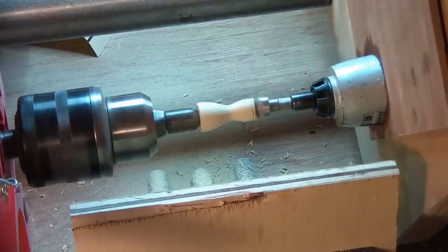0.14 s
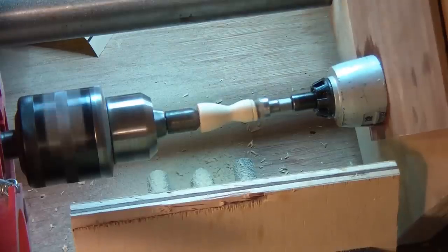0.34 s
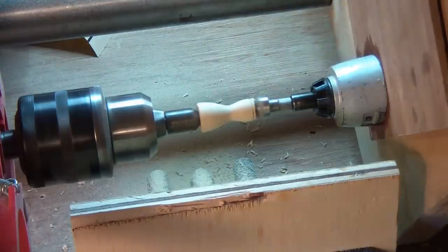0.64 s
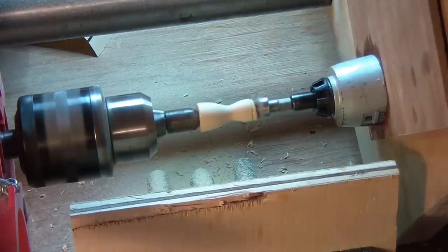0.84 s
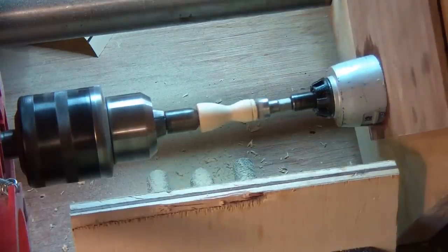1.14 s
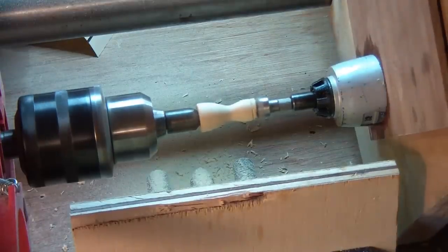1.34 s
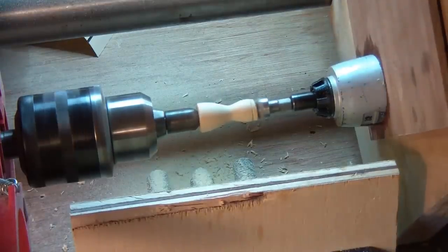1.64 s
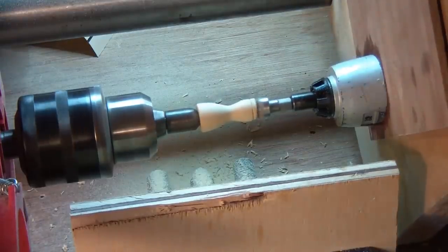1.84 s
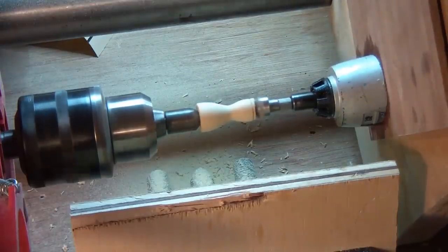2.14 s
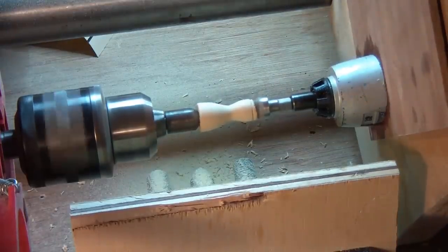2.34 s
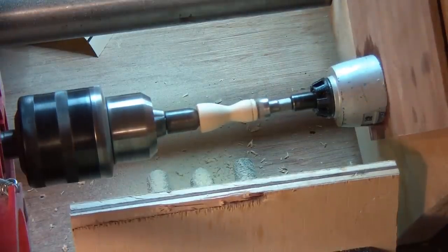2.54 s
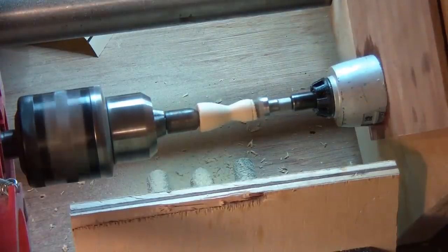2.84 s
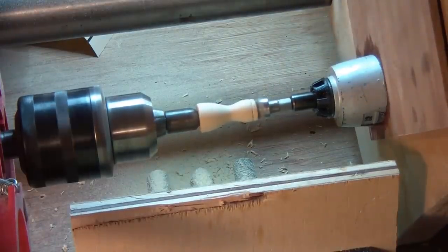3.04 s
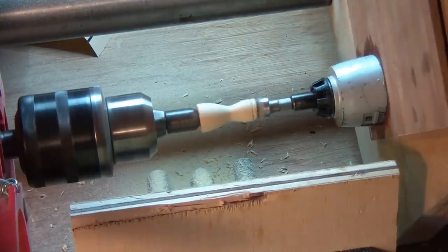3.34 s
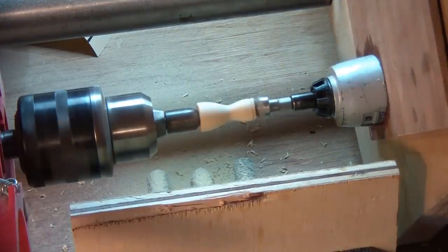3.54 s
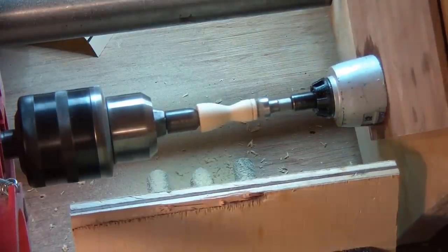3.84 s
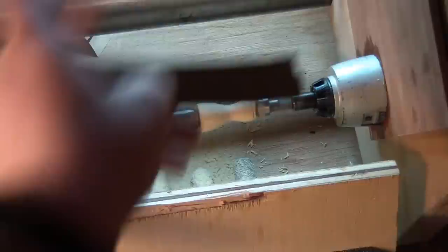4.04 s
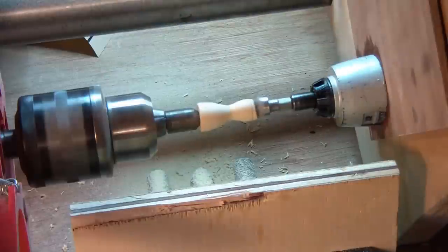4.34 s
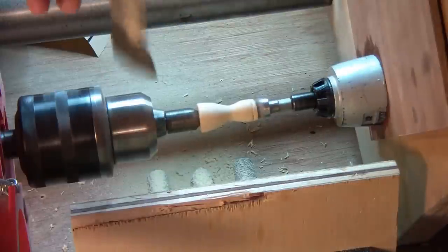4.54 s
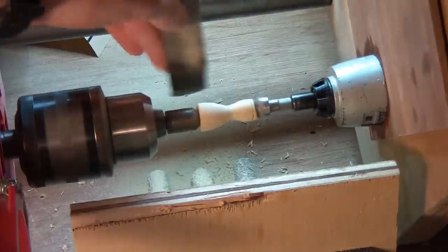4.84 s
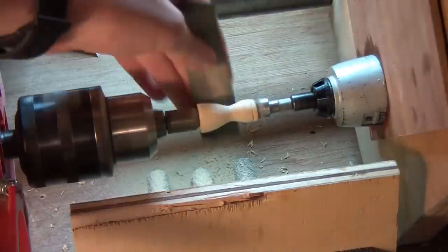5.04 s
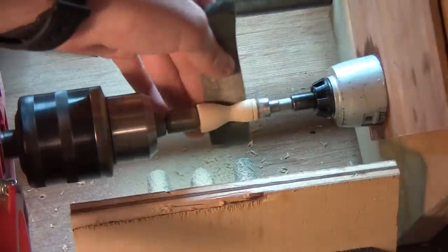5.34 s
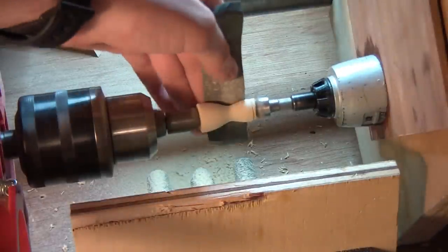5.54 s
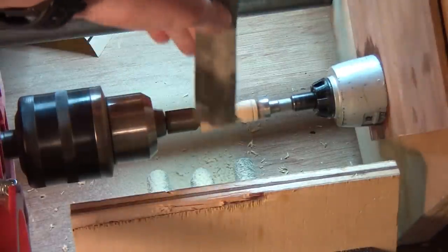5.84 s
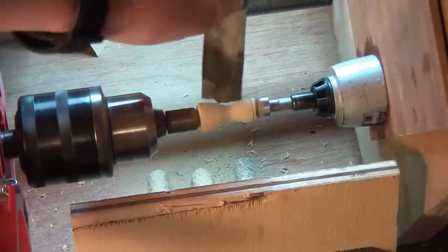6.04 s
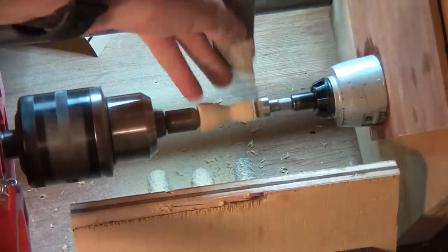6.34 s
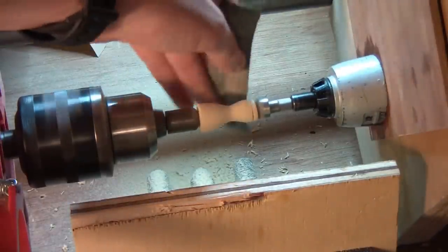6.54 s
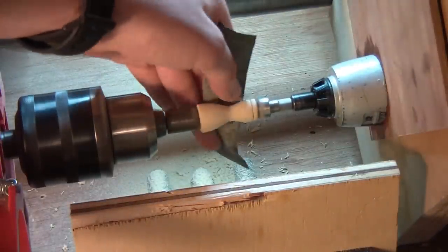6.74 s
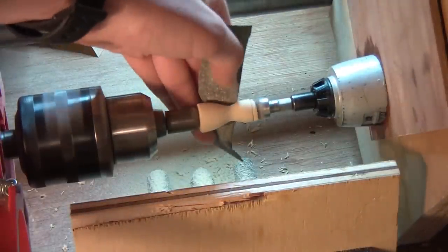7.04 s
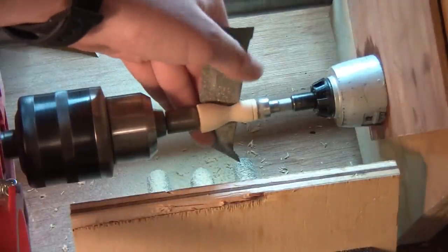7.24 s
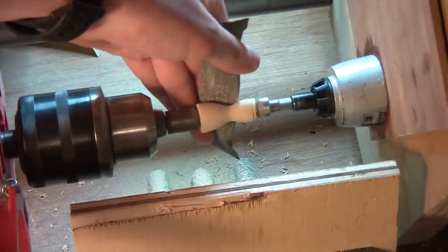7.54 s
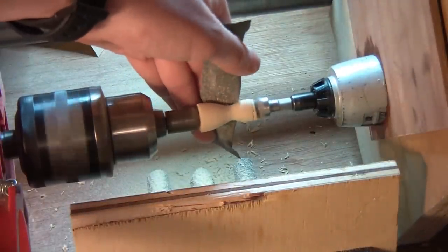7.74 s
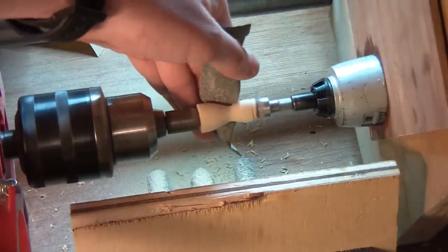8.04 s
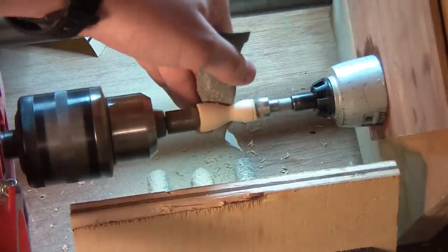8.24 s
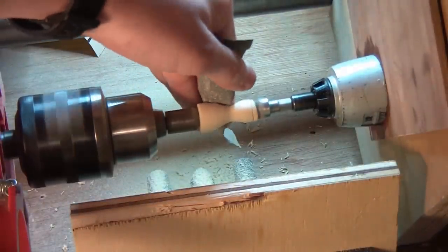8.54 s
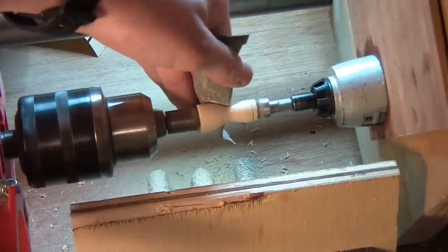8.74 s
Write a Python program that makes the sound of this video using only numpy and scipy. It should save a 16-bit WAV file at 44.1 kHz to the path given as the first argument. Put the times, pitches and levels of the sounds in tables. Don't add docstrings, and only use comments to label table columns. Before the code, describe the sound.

Constant buzzing motor hum with belt rumble; sandpaper rustles in the hands, bites wood in a short rasp, then a longer, brighter fizzing hiss.

```python
import sys
import numpy as np
from scipy import signal
from scipy.io import wavfile
from scipy.ndimage import uniform_filter1d

SR = 44100
rng = np.random.default_rng(int(sys.argv[2]) if len(sys.argv) > 2 else 0)


def amplitude_ratio(level_db):
    exponent = np.asarray(level_db, float) / 20
    return 10 ** exponent


def unload_audio(sound):
    columns = np.transpose(np.atleast_2d(sound))
    steps = np.round(np.clip(columns, -1, 1) * 32767)
    wavfile.write(sys.argv[1], SR, steps.astype(np.int16))


N = 392049
T = np.arange(N) / SR

FIELD_HZ, ROTOR_HZ, BELT_HZ, SPINDLE_HZ = 99.964, 24.812, 6.1, 13.4
EDGE_HZ = 10880

# time in seconds, hum level in dB,
# damping by the hand on the work from 0 to 1, belt shake in dB.
MOTOR = [(0, -17, 0.05, 2), (.44, -17, 0, 0), (1, -17.5, 0.02, 1.5), (1.6, -17.5, 0.05, 0),
         (2.2, -18, 0.12, 1), (2.6, -18, 0, 1.5), (3.2, -16, 0.12, 0), (4, -17, 0, 1), (4.7, -16, .05, .5),
         (5.4, -17, 0, 0.5), (6, -17.5, 0, 1.5), (6.7, -17, 0.02, -0.5), (7.15, -15.5, 0.12, -0.5),
         (7.8, -17, 0.13, 1), (8.05, -18, 0.14, 0), (8.35, -18.5, 0.2, 1), (8.45, -19.5, 0.86, 0),
         (8.89, -17.5, 0.6, 2)]


def evened(x):
    return x / np.sqrt(np.mean(x ** 2) + 1e-20)


def read(points, hz):
    f, value = np.transpose(points)
    return np.interp(np.log(hz + 1), np.log(f + 1), value)


def curves(rows):
    s, *columns = np.transpose(rows)
    return [np.interp(T, s, column) for column in columns]


def wander(rate_hz):
    r = np.exp(-2 * np.pi * rate_hz / SR)
    return evened(signal.lfilter([1], np.convolve([1, -r], [1, -r]), rng.standard_normal(N)))


def noise(gain, patchy_db, flicker_db, near=1):
    # frequency in Hz, side minus mid in dB.
    port_difference = [(30, -11), (70, -14), (120, -25), (550, -25), (800, -18), (3500, -12.5), (5000, -4),
                       (6400, 1.5), (7500, -0.5), (8000, -1), (9700, -2), (10700, -0.5)]
    frames, hz = N // 256 + 5, np.fft.rfftfreq(1024, 1 / SR)
    a, b, c, d, patches = rng.standard_normal((frames, 513, 5)).T
    patches = uniform_filter1d(patches, size=12, axis=0)
    patches = evened(uniform_filter1d(patches, size=10, axis=1))
    flicker = evened(uniform_filter1d(rng.standard_normal(frames), size=4))
    mid = a + 1j * b
    side = amplitude_ratio(near * read(port_difference, hz))[:, None] * (c + 1j * d + 0.074 * mid)
    z = np.array([mid + side, mid - side])
    z *= gain(hz)[:, None] * amplitude_ratio(patchy_db * patches + flicker_db * flicker)
    return evened(signal.istft(z, nperseg=1024, noverlap=768)[1][:, :N])


def tone(hz, width_hz=0.):
    drift = np.cumsum(rng.standard_normal(N)) * np.sqrt(2 * np.pi * abs(width_hz) / SR)
    return np.sqrt(2) * np.cos(2 * np.pi * (hz * T + rng.random()) + drift)


def each_turn(hz, count):
    harmonics = range(1, count + 1)
    return evened(sum(np.cos(2 * np.pi * (k * hz * T + rng.random())) / np.sqrt(k) for k in harmonics))


def bursts(rows, sound, rise):
    shape = np.zeros(N)
    for s, db, t60 in rows:
        start = round((s - .05) * SR)
        u = T[start:][:SR // 2] - s
        shape[start:][:SR // 2] += amplitude_ratio(db + np.where(u < 0, 60 * u / rise, -60 * u / max(t60, .01)))
    return shape * sound


def swells(rows):
    total = 0
    for s, db, rise, fall in rows:
        away = np.where(T < s, (s - T) / max(rise, .01), (T - s) / max(fall, .01))
        total = total + amplitude_ratio(db - 20 * away)
    return total


def hum():
    # multiple, level in dB above the first order.
    upper_orders = [(4, -13.8), (6, -14), (7, -23), (8, -21.5), (9, -23.5), (15, -34)]
    whirr_hz = [140, 181.2, 254, 267, 327, 354, 487, 512.4, 575, 624.5, 750, 775, 819.7, 855, 1020, 1120,
                1144, 1244.4, 1270, 1445, 1715, 2331, 2719, 3085, 3391, 4390, 7290, 8280]
    # level in dB above the first order, width in Hz.
    whirr_lines = [(-27, 13), (-18, 1.96), (-22, 4.4), (-19, 4.9), (-19.5, 6), (-17, 1.6), (-20, 3.2),
                   (-19.5, 1.1), (-18.5, 1), (-24, 0.83), (-27.5, 3), (-28, 4.7), (-20, 0.75), (-25.5, 8),
                   (-26.5, 7.9), (-31.5, 6), (-24, 1.8), (-30, 4.5), (-39, 1.8), (-30, 3), (-30, 9),
                   (-41, 15), (-35.5, 15), (-42, 60), (-64, 10), (-38, 50), (-55, 60), (-46, 50)]
    first_db, damping, _ = curves(MOTOR)
    orders = [(1, 0.003), (2, -3 * damping), (3, -8.5 - 12 * damping), (5, -0.1 - 1.5 * damping)]
    belt, rotor = each_turn(BELT_HZ, count=3), each_turn(ROTOR_HZ, count=1)
    cycle = 2 * np.pi * FIELD_HZ * (T - .0046)
    angle = cycle + .015 * belt + .01 * wander(8.0) + .006 * rotor
    spread = .55
    pull = 0
    for k, db in orders + upper_orders:
        shake_db = 0.42 * np.sqrt(k) * belt + 0.15 * np.sqrt(k) * wander(16.0)
        pull = pull + amplitude_ratio(db + shake_db) * np.sqrt(2) * np.cos(k * angle - spread * k * (k - 1))
    whirr = sum(amplitude_ratio(db + 2.2 * wander(7.8)) * tone(hz, width)
                for hz, (db, width) in zip(whirr_hz, whirr_lines))
    lap = 2 * np.pi * ROTOR_HZ * (T - .014)
    fifth = 5 * angle - spread * 20
    slip = amplitude_ratio(-5.5 + 2.1 * wander(4.4)) * (np.cos(fifth - lap) + amplitude_ratio(-9.0) * np.cos(fifth + lap))
    mono = amplitude_ratio(first_db) * (pull + whirr + slip)
    side = amplitude_ratio(-14.5) * (np.roll(mono, 72) + 0.15 * mono)
    return np.array([mono + side, mono - side])


def rumble():
    # frequency in Hz, level in dB per Hz.
    frame_spectrum = [(20, -34), (40, -15), (80, -7), (150, -8.5), (185, -9), (235, -3), (270, -3.5),
                      (352, 5), (450, -4.5), (540, -8), (620, -3.5), (800, -15.5), (1100, -27.5),
                      (1600, -43.5)]
    # frequency in Hz, level in dB per Hz.
    rattle_spectrum = [(350, -32), (600, -2), (661, -24.5), (711, -10), (755, -11), (873, -10), (1060, -10),
                       (1150, -9), (1510, -15), (1800, -18), (2930, -23), (3120, -21.5), (3350, -26),
                       (8620, -40.5), (10800, -46.5), (14100, -78), (22000, -120)]
    # time in seconds, peak in dB, ring time in seconds.
    belt_knocks = [
        (6.0, -23.5, 0.13),
        (7.92, -24, 0.098),
        (8.14, -26, 0.2),
        (8.285, -24, 0.24),
        (8.67, -22, 0.055),
    ]
    hum_db, damping, shake_db = curves(MOTOR)
    surge = wander(12.0)
    frame_db = hum_db - 9.5 - 3 * damping + 0.4 * wander(5.6) + 0.45 * shake_db
    rattle_db = 0.96 * (hum_db + 17) - 17 - 11.5 + 0.5 * surge + shake_db
    beat = each_turn(BELT_HZ, count=4)
    frame = noise(lambda hz: amplitude_ratio(read(frame_spectrum, hz)), patchy_db=1.5, flicker_db=2.5)
    rattle = noise(lambda hz: amplitude_ratio(read(rattle_spectrum, hz)), patchy_db=1.0, flicker_db=1.0)
    throb_db = 0.82 * beat + 0.27 * each_turn(ROTOR_HZ, count=2) + 0.52 * each_turn(FIELD_HZ, count=1)
    thud = noise(lambda hz: 1 / (1 + ((hz - 1200) / 1300) ** 2), patchy_db=1, flicker_db=1)
    knocks = bursts(belt_knocks, thud, rise=.04)
    frame = amplitude_ratio(frame_db + 4.5 + .7 * beat) * frame
    return frame + amplitude_ratio(rattle_db + 1.5 + throb_db) * rattle + knocks


def paper():
    # time in seconds, peak in dB, rise and fall in seconds.
    rustles = [(.01, -43, 0.018, .1), (.13, -48, .1, .3), (2.2, -41.5, 0.31, 0.11),
               (2.35, -46, 0.065, 0.042), (2.8, -37, .2, 0.12), (2.87, -40, 0.069, 0.11),
               (3.3, -38, .05, .1), (3.47, -44, .06, .06), (3.59, -37, 0.12, 0.066), (3.78, -42, .1, .1),
               (3.92, -38.5, 0.072, .08), (4.05, -44, .06, .1), (4.27, -33.5, 0.084, 0.067),
               (4.42, -39, 0.091, .1), (4.56, -44, .08, .1), (4.83, -41, 0.053, 0.11),
               (5.1, -52, .15, 0.13), (5.3, -47, .08, .08), (6.12, -51, .05, .06),
               (6.25, -37.5, 0.063, .18)]
    # time in seconds, pressure in dB, tension from 0 to 1,
    # wrap round the wood from 0 to 1.
    strokes = [
        [(5.36, -60, .8, .1), (5.4, -29.5, 0.75, 0.2), (5.456, -27, 0, 0.6), (5.6, -23, .1, 0.47),
         (5.7, -25.5, 0.4, 0.8), (5.83, -22.5, .1, 0.73), (5.886, -30, 0.1, 0.1), (6.0, -40.5, .2, 0.3),
         (6.2, -47, .1, 0.7)],
        [(6.99, -60, .6, .3), (7.03, -37, 0.8, 0.5), (7.21, -32, 0.65, 0.8), (7.6, -29.5, 0.56, 1),
         (7.88, -28.5, .45, 1), (8.05, -31, .5, 1), (8.35, -29, 0.45, 0.95), (8.6, -27, 0.68, 0.9),
         (8.89, -28, .75, 0.86)],
    ]
    # frequency in Hz, width in Hz.
    resonances = [(3300, 5000), (5700, 1900), (10500, 1300)]
    loose_db = [4, -7.5, -15]
    slack_db = [-3.5, -13.5, -20]
    # frequency in Hz, width in Hz, level in dB added to twice the sing's
    # level in dB.
    whistles = [(5020, 40, -10), (5670, 90, -7), (6100, 40, -11), (7040, 40, -15)]
    lifted = [(s, -90, 0, 0) for s in (5.3, 6.4, 6.9)]
    pressure_db, tension, wrap = curves(sorted(sum(strokes, lifted)))
    pressed, loose = amplitude_ratio(pressure_db), swells(rustles)
    gained_db = [-13 * wrap, 13.5 * tension, 17 * wrap]
    broad = noise(lambda hz: hz ** 2 / (hz ** 2 + 2500 ** 2) * (hz < EDGE_HZ),
                  patchy_db=-0.5, flicker_db=-0.6, near=4.0)
    rings = 0
    for (f, w), slack, gained, handled in zip(resonances, slack_db, gained_db, loose_db):
        gain = pressed * amplitude_ratio(slack + gained) + loose * amplitude_ratio(handled)
        ring = noise(lambda hz: (hz < EDGE_HZ) / (1 + (2 * (hz - f) / w) ** 2),
                     patchy_db=-1.5, flicker_db=1.3, near=2.3)
        rings = rings + gain * amplitude_ratio(-0.5) * ring
    sing_db = slack_db[1] + gained_db[1]
    whistle = sum(amplitude_ratio(2 * sing_db + db + 0.5 + 2.6 * wander(5.6)) * tone(hz, width)
                  for hz, width, db in whistles)
    grain_db = 0.47 * each_turn(SPINDLE_HZ, count=2) + 1.2 * wander(300.) + 0.9 * wander(14.)
    return amplitude_ratio(grain_db) * (amplitude_ratio(-3.5) * (pressed + loose) * broad + rings + pressed * whistle)


def creases():
    # time in seconds, peak in dB, ring time in seconds, tilt in dB taken from the dull and given to
    folds = [(2.2154, -25.5, 0.1, -3), (2.3067, -26, 0.12, -3), (2.3401, -26.5, 0.077, -3),
             (2.7521, -28, 0.1, -5), (2.8294, -29, 0.1, -6.5), (3.0395, -40, 0.1, 0),
             (3.1168, -29, 0.1, -5.5), (3.2944, -18, 0.1, -0.5), (3.5793, -23, 0.083, -5),
             (3.6491, -22.5, 0.12, 1), (4.0347, -29, 0.1, 0), (4.2502, -19, 0.1, -0.5),
             (4.6049, -30, 0.1, 4), (4.812, -29, 0.11, 6), (5.3901, -23, 0.1, 0)]
    # time in seconds, peak in dB, ring time in seconds.
    first_bite = [
        (5.395, -27, 0.32),
    ]
    dull = noise(lambda hz: hz ** 2 / (hz ** 2 + 1900 ** 2) / (1 + (hz / 5500) ** 4),
                 patchy_db=.8, flicker_db=0)
    bright = noise(lambda hz: hz ** 2 / (hz ** 2 + 7000 ** 2) * (hz < EDGE_HZ), patchy_db=2, flicker_db=1)
    ring = noise(lambda hz: 1 / (1 + ((hz - 5700) / 600) ** 2), patchy_db=1.5, flicker_db=1)
    crackle = amplitude_ratio(4.0 * wander(500.) - 9.0)
    peak = .004
    low_rows = [(s + peak, db - tilt, t60) for s, db, t60, tilt in folds]
    high_rows = [(s + peak, db + tilt - 9.5, t60) for s, db, t60, tilt in folds]
    clumps = bursts(low_rows, dull, rise=.04) + bursts(high_rows, bright, rise=0.045)
    return crackle * clumps + bursts(first_bite, ring, rise=.03)


def shed(x, wet_db=-11., t60=.12):
    taps = np.zeros(6000)
    at = np.arange(40, 5980, 20) + rng.integers(0, 20, size=297)
    taps[at] = rng.choice([-1., 1.], size=297) * amplitude_ratio(-60 * at / SR / t60)
    echo = signal.oaconvolve(x, evened(taps)[None] / np.sqrt(len(taps)))[:, :N]
    return x + amplitude_ratio(wet_db) * echo


def scene():
    return hum() + shed(rumble() + paper() + creases())


def low_pass(x):
    return signal.sosfilt(signal.butter(12, 12120, fs=SR, output="sos"), x)


def record(dry):
    left, right = 1.15 * np.tanh(dry / 1.08)
    middle_side = np.array([left + right, left - right]) / 2
    mid, side = signal.stft(middle_side, nperseg=2048, noverlap=1536)[2]
    step = np.sqrt(uniform_filter1d(abs(mid) ** 2, size=31, axis=0))
    hz = np.fft.rfftfreq(2048, 1 / SR)[:, None]
    bands = rng.standard_normal((65, mid.shape[1] // 2 + 1))
    bands = bands.repeat(16, 0).repeat(2, 1)[:1025, :mid.shape[1]]
    threshold_db = np.where(hz < 600, -6.5, 1.5) - 7 * (hz < 140) + 4.5 * bands
    side = side * (abs(side) > step * amplitude_ratio(threshold_db))
    side = side * np.where(hz < 140, amplitude_ratio(-2.5) * np.exp(-.7j), 1)
    side = side * amplitude_ratio(np.where(hz < 600, 0., 7 * (hz < 4000)))
    mid = mid * amplitude_ratio(-20 * (hz > 4500) * (bands > 2.2))
    both = signal.istft(np.array([mid + side, mid - side]), nperseg=2048, noverlap=1536)[1][:, :N]
    edge = signal.firwin(1023, EDGE_HZ, window=("kaiser", 11), fs=SR)
    return low_pass(signal.oaconvolve(both, edge[None], "same"))


dry = scene()
out = record(dry)
unload_audio(out)
```